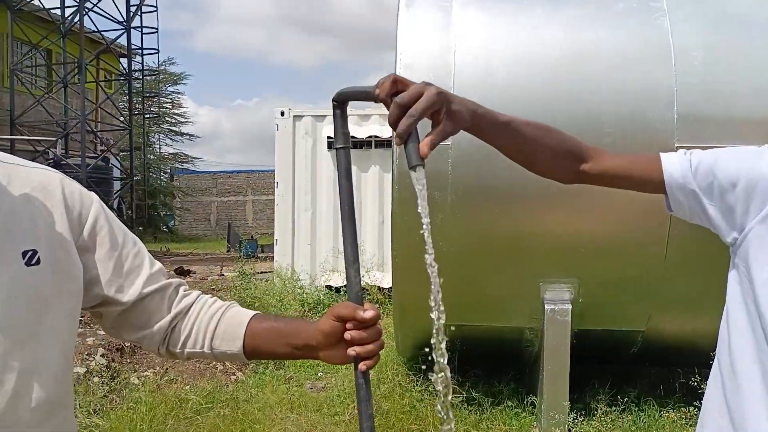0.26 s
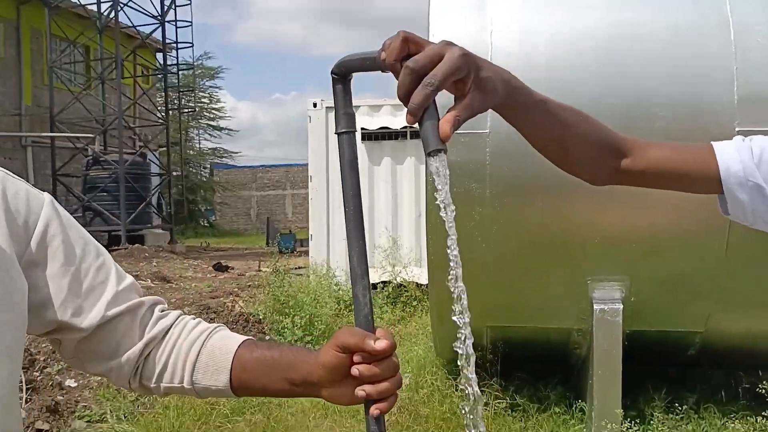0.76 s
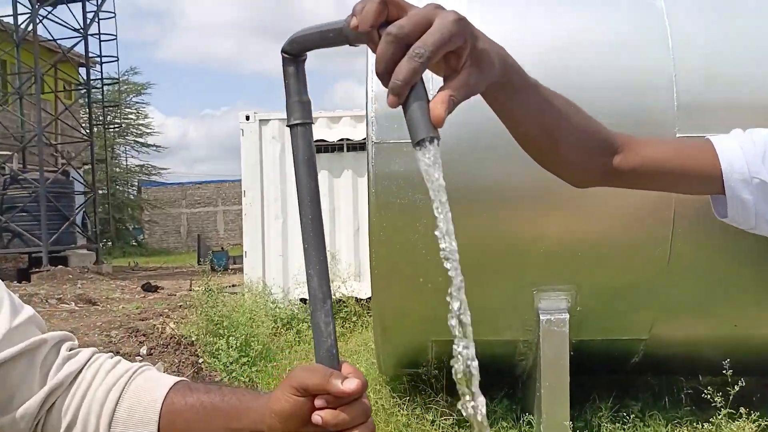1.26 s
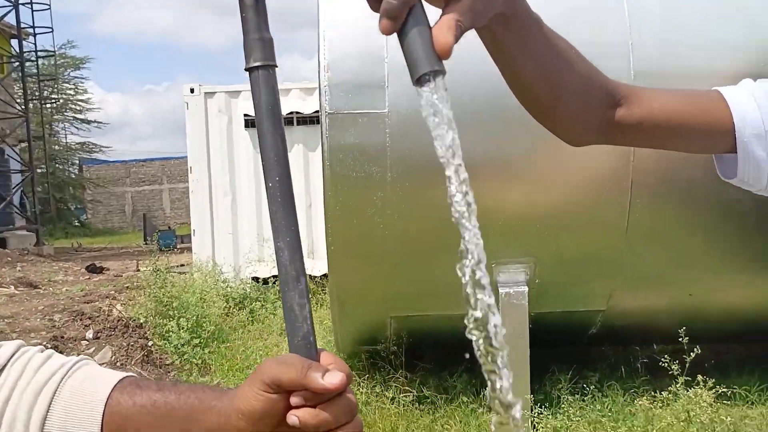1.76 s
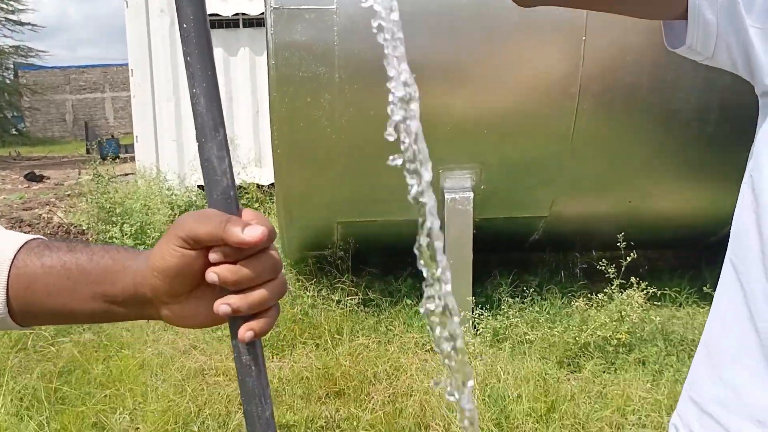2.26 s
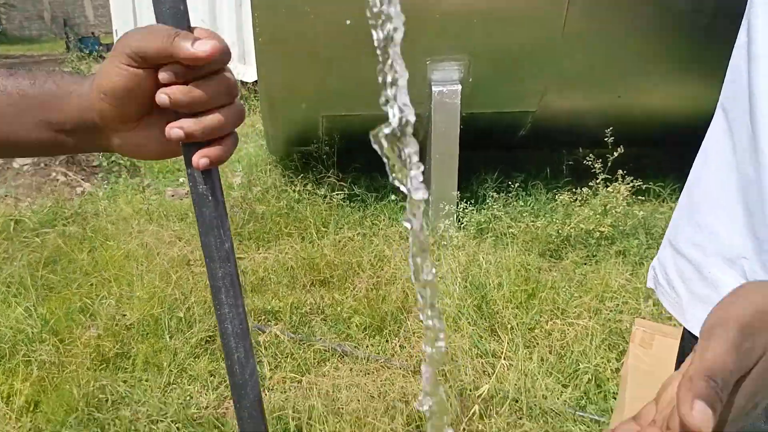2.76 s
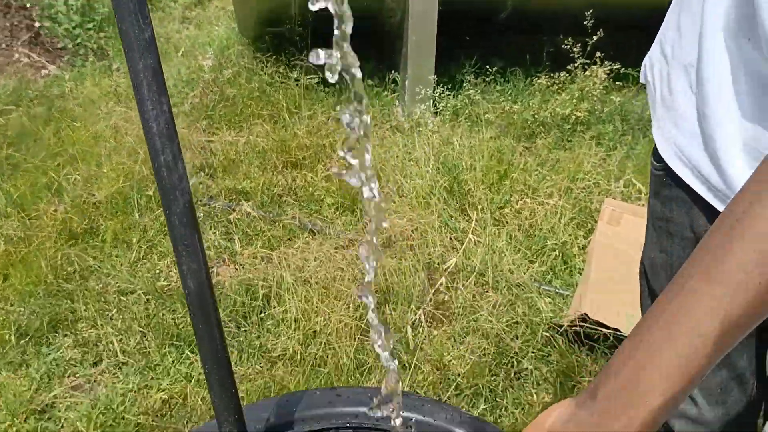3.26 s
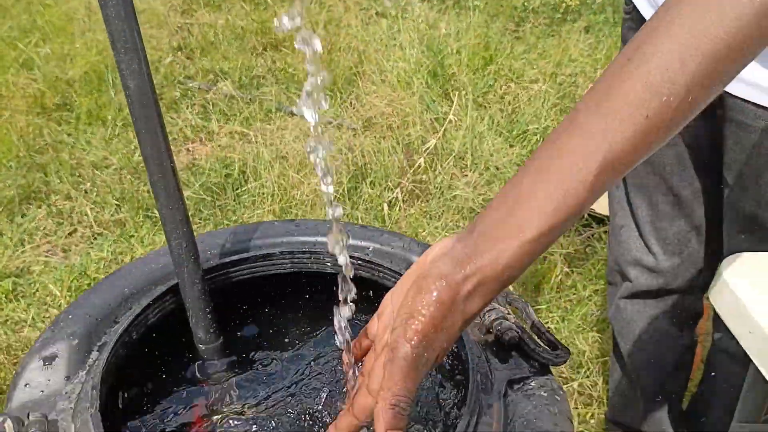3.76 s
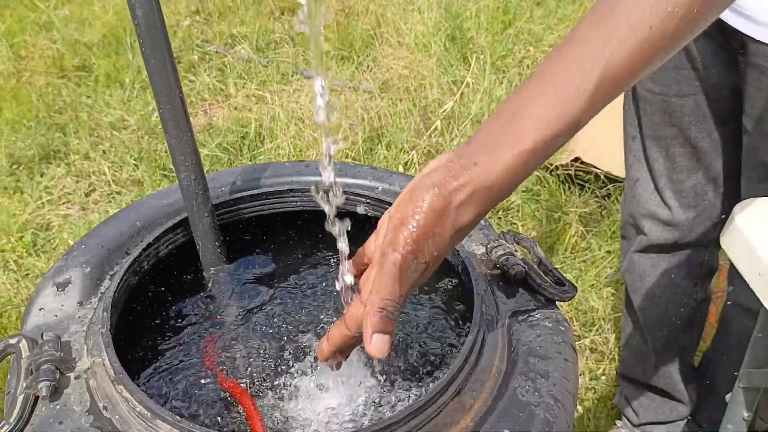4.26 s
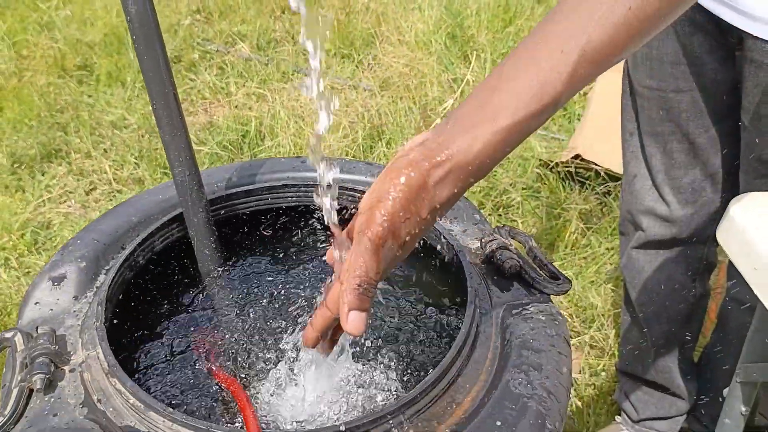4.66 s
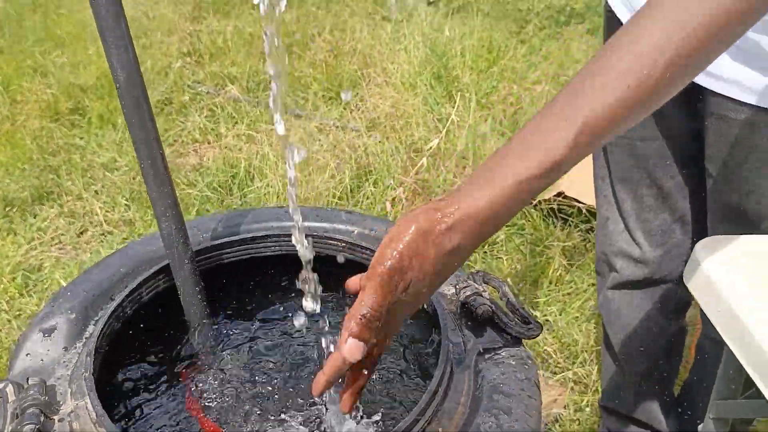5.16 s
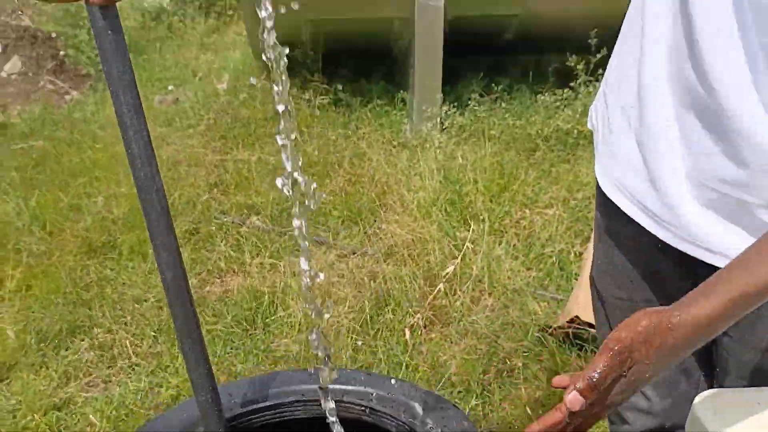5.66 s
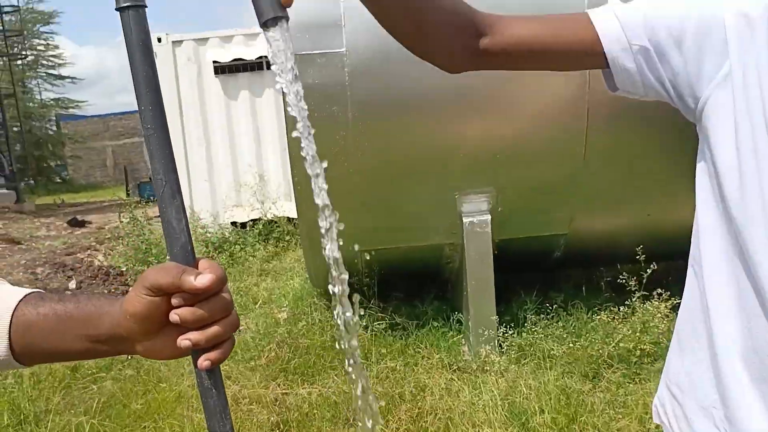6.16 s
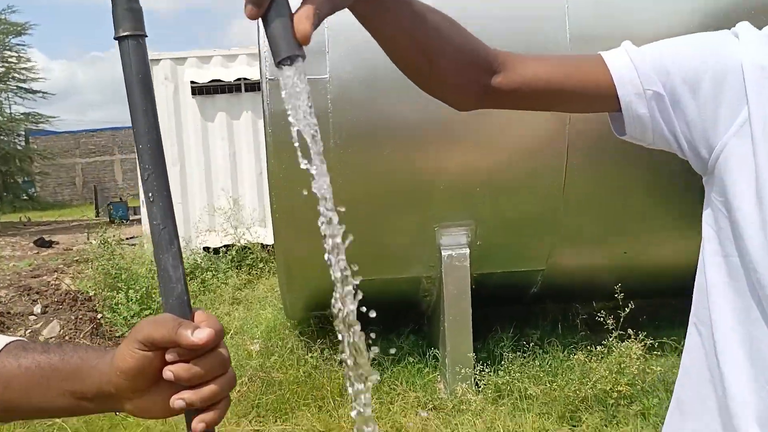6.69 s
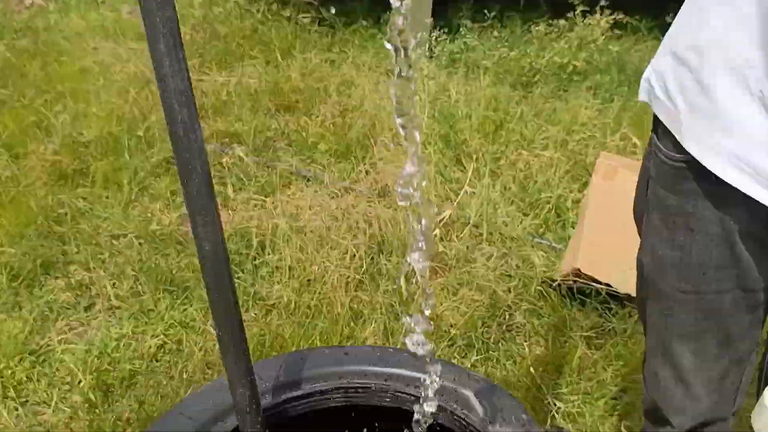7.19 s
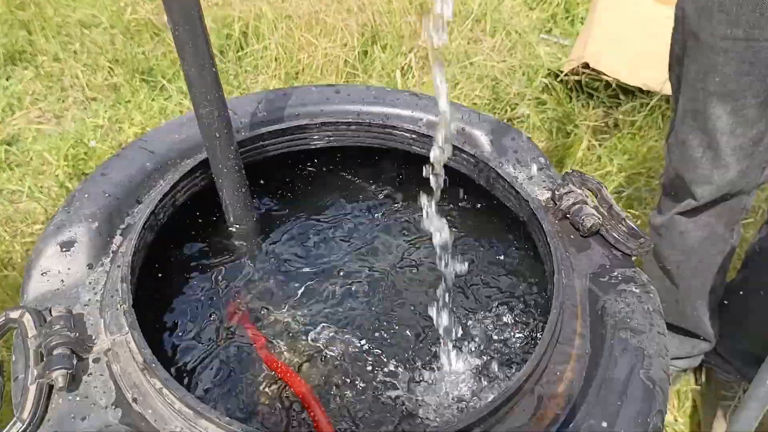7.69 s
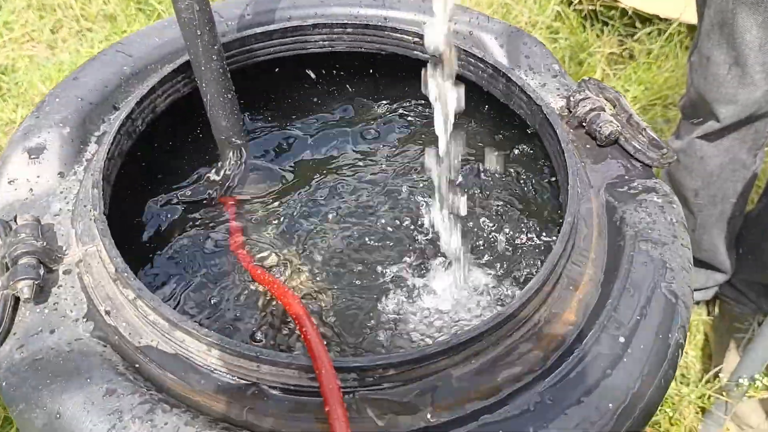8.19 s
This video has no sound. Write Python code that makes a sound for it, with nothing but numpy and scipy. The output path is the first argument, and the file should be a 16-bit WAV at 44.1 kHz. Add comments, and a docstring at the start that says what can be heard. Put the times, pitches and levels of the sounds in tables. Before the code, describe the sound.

A thin stream of water dribbles and plops into a full drum outdoors, bursts into loud bright spray over a hand, then thins to lighter splashes.

```python
"""A thin, uneven stream from a pump's outlet pipe first falls on open water in a full plastic drum outdoors,
then into foam: each surge is filtered drop noise and ringing bubbles that die away over a foam tail.
Just after 3 s it breaks over a hand into loud, bright spray; by 4.5 s it runs off the fingertips.
It then falls past the fingers, plunges from 6.6 s and ends shallow. Throughout, slaps (noise bursts
through resonances), plops (dying sines) and low noise of air on the microphone cross a quiet yard."""
import sys
import numpy as np
from scipy import signal
from scipy.io import wavfile
from scipy.ndimage import uniform_filter1d

SR = 44100
rng = np.random.default_rng(int(sys.argv[2]) if len(sys.argv) > 2 else 0)


def transcribe(u):
    """Save the signal u as a 16-bit wav file named by the first command-line argument.

    u: samples, shape (n,) or (channels, n), limited to [-1, 1]; the rate is SR.
    q: integer samples, one column per channel.
    """
    v = np.clip(np.atleast_2d(u).T, -1, 1)
    q = np.round(v * 32767).astype(np.int16)
    wavfile.write(sys.argv[1], SR, q)


N = 371763
TIME_S = np.arange(N) / SR
FLOW_STEP = 32  # samples between computed surge levels
RUMBLE_EDGE_HZ, GURGLE_EDGE_HZ, SPRAY_EDGE_HZ, CUTOFF_HZ = 130, 1000, 4400, 15700


def amp(db):
    """Decibels to gain."""
    return 10 ** (np.asarray(db) / 20)


def unit(x):
    """Scales to rms 1."""
    return x / np.sqrt(np.mean(x ** 2) + 1e-20)


def steady(x, size=2600):
    """Holds the rms near 1 over about a tenth of a second and keeps the quicker grain."""
    power = uniform_filter1d(uniform_filter1d(x ** 2, size), size)
    return x / np.sqrt(abs(power) + 1e-14)


def follow(rows):
    """Interpolates the columns of a curve to every sample."""
    time_s, *columns = np.transpose(rows)
    return [np.interp(TIME_S, time_s, column) for column in columns]


def add(mix, start_s, sound):
    """Mixes a sound in at its start time."""
    part = mix[max(round(start_s * SR), 0):][:len(sound)]
    part += sound[:len(part)]


def colour(x, spectrum, size=4096):
    """Minimum-phase filter with the given spectrum: causal, so that clicks stay sharp."""
    hz, db = np.transpose(spectrum)
    bin_hz = abs(np.fft.fftfreq(size, 1 / SR))
    log_gain = np.log(amp(np.interp(np.log(bin_hz + 1), np.log(hz), db)))
    taps = np.fft.ifft(np.exp(np.conj(signal.hilbert(log_gain)))).real
    return signal.oaconvolve(x, taps[:size // 2])[:len(x)]


def band(x, edge_hz, kind, order=5):
    """Butterworth filter."""
    return signal.sosfilt(signal.butter(order, edge_hz, kind, fs=SR, output="sos"), x)


def resonate(x, hz, width_hz):
    """Resonance of peak gain 1 that may move: shift to 0 Hz, smooth, shift back."""
    turn = np.exp(2j * np.pi * np.cumsum(hz * np.ones(len(x))) / SR)
    r = np.exp(-np.pi * width_hz / SR)
    smoothed = signal.lfilter([1 - r], [1, -r], x / turn + 1e-18)
    return 2 * (turn * smoothed).real


def emphasise(x, hz, width_hz, db):
    """Adds a steep-sided resonance that may move."""
    return x + amp(db) * resonate(resonate(x, hz, width_hz), hz, width_hz)


def wander(per_s):
    """Smooth random curve of rms 1."""
    points = rng.standard_normal(max(int(2 * per_s * N / SR), 4))
    return unit(signal.resample(points, N // 8 + 1)).repeat(8)[:N]


def patchy(x, depth_db, size=(19, 3)):
    """Lets narrow bands swell and fade as the foam changes shape; size in (frames, bins)."""
    z = signal.stft(x, nperseg=768, noverlap=640)[2]
    field = rng.standard_normal(z.shape)
    field = uniform_filter1d(field, size[0], axis=1)
    field = uniform_filter1d(field, size[1], axis=0)
    return signal.istft(z * amp(depth_db * unit(field)), nperseg=768, noverlap=640)[1][:N]


def bubble(hz, t60_s, rise, attack_cycles):
    """A dying sine whose pitch rises, by the share rise over t60, as the bubble nears the surface."""
    t = np.arange(int(max(t60_s, .002) * SR)) / SR
    onset = 1 - np.exp(-t * hz / attack_cycles)
    return onset * amp(-60 * t / t60_s) * np.sin(2 * np.pi * hz * t * (1 + rise * t / t60_s / 2))


# Spectrum of the quiet yard. Each row: frequency in Hz, relative density in dB per Hz.
YARD_SPECTRUM = [(59, -37.5), (100, 0), (228, -5.5), (655, 0), (809, -16), (1210, -1), (3470, -12.5),
                 (9370, -10.5), (15600, -14.5)]
YARD_DB = -69.5


def yard():
    """Steady filtered noise of the quiet yard."""
    return amp(YARD_DB) * unit(colour(rng.standard_normal(N), YARD_SPECTRUM))


# Surges of the stream. Each row: start in seconds, rise in seconds, hold in seconds, splash fade in dB
# per second, then splash, gurgle and fine spray levels in dB before the trims in stream().
SURGES = [(0.0, 0.0019, 0.028, 143, -62.5, -63.5, -61), (0.295, 0.0066, 0.17, 92, -62, -68.6, -57),
          (0.385, 0.058, 0.024, 44, -39, -48.5, -42.5), (0.574, 0.014, 0.16, 232, -45, -71, -63),
          (0.735, 0.0053, 0.053, 249.5, -47.5, -56.5, -50), (0.86, 0.004, 0.11, 280, -55.5, -55.5, -75.8),
          (1.073, 0.032, 0.136, 121, -54.5, -64.7, -64), (1.186, 0.029, 0.16, 100, -45, -54, -49.5),
          (1.457, 0.0037, 0.078, 42.5, -50, -60, -60.5), (1.589, 0.0027, 0.016, 280, -46, -67.8, -66.8),
          (2.068, 0.006, 0.1, 173, -61.5, -70.0, -69), (2.195, 0.016, 0.053, 62, -53.5, -53.5, -53),
          (2.29, 0.005, 0.13, 145, -56.2, -57, -67.4), (2.56, 0.21, 0.016, 46, -73, -69.5, -56.5),
          (2.784, 0.016, 0.012, 282, -43, -51.5, -44.5), (2.862, 0.009, 0.1, 57, -54.0, -63.5, -55.4),
          (3.002, 0.13, 0.015, 74, -25.6, -35, -21), (3.244, 0.18, 0.44, 42, -21, -36.5, -17.5),
          (3.244, 0.0083, 0.028, 106, -21, -39.5, -44), (3.967, 0.0029, 0.4, 107, -21.5, -40, -23.5),
          (4.387, 0.003, 0.032, 49.5, -29.5, -38, -46), (4.922, 0.029, 0.36, 58, -57, -65.5, -76),
          (5.298, 0.0022, 0.13, 66, -42.5, -49.5, -48.4), (5.494, 0.023, 0.023, 283, -52, -44.2, -65.5),
          (5.59, 0.04, 0.4, 17, -55, -59, -55.5), (5.831, 0.042, 0.055, 79, -40, -38.5, -40),
          (6.025, 0.003, 0.36, 261, -49, -65, -67), (6.606, 0.021, 0.041, 49, -33, -49, -41),
          (6.694, 0.0024, 0.0088, 130, -31, -35, -37.5), (6.909, 0.022, 0.088, 116, -39.5, -52.5, -54),
          (7.123, 0.0033, 0.12, 117.5, -50.0, -67, -61), (7.769, 0.027, 0.065, 279, -62.5, -74, -65.5),
          (8.277, 0.068, 0.015, 134.5, -54.9, -54.5, -51.1)]
GURGLE_FADE, SPRAY_FADE = 0.87, 0.78  # shares of the splash fade
FOAM_DB, FOAM_FADE_DB_PER_S = -26.7, 18.5  # foam tail relative to its surge
TRICKLE_DB = -81.5  # thin trickle between surges, in each band before trims


def swell(start_s, rise_s, hold_s, fade_db_per_s):
    """Power of one surge: it builds, holds, then dies away quickly over its slowly dying foam."""
    age_s = TIME_S[::FLOW_STEP] - start_s
    late_s = np.maximum(age_s - rise_s - hold_s, 0)
    build = np.clip(age_s / max(rise_s, .002), 0, 1) ** 2
    surge = amp(-fade_db_per_s * late_s) ** 2
    foam_tail = amp(FOAM_DB - FOAM_FADE_DB_PER_S * late_s) ** 2
    return build * (surge + foam_tail)


def flow():
    """Levels in dB of the splash, the gurgle and the spray: all surges add power to the trickle."""
    power = amp(TRICKLE_DB) ** 2
    for start_s, rise_s, hold_s, fade, *levels_db in SURGES:
        power = power + np.array([amp(db) ** 2 * swell(start_s, rise_s, hold_s, fade * share)
                                  for db, share in zip(levels_db, (1, GURGLE_FADE, SPRAY_FADE))])
    return [np.interp(TIME_S, TIME_S[::FLOW_STEP], 10 * np.log10(part)) for part in power]


# Spectrum of air on the microphone, before a 200 Hz low-pass.
# Each row: frequency in Hz, relative density in dB per Hz.
RUMBLE = [(8.8, -35), (15, 6), (43, 1), (59, -4), (80, -7), (102, -4), (134, -13.5), (200, -13.5),
          (260, -42.5), (440, -120)]
# Single gusts. Each row: centre in seconds, peak in dB before gust_db, time from the peak to 1/e power
# in seconds.
GUSTS = [(0.48, -42, .025), (0.64, -48, 0.025), (2.11, -54, 0.036), (2.92, -46, 0.033), (3.09, -30, 0.046),
         (3.41, -33.5, 0.06), (3.67, -34, 0.034), (3.85, -22, 0.02), (6.8, -44.5, .08), (8.35, -49, 0.028)]
# Buffeting level at the reference gurgle level, and its slope in dB per dB of gurgle.
BUFFET_DB, AT_GURGLE_DB, BUFFET_SLOPE = -43.5, -37, .8


def wind(gurgle_db, gust_db, lumpy_db):
    """Lumpy low rumble of air on the microphone, rising with each surge and in single gusts."""
    rumble = band(colour(rng.standard_normal(N), RUMBLE), 200, "low")
    rumble = rumble * amp(lumpy_db * wander(per_s=14))
    power = amp(BUFFET_DB + BUFFET_SLOPE * (gurgle_db - AT_GURGLE_DB)) ** 2
    for centre_s, peak_db, width_s in GUSTS:
        shape = np.exp(-np.minimum(((TIME_S - centre_s) / width_s) ** 2, 50))
        power = power + amp(peak_db + gust_db) ** 2 * shape
    return np.sqrt(power) * steady(rumble, size=4400)


# Large bubbles. Each row: start in seconds, level in dB, starting pitch in Hz, ring time t60 in seconds.
PLOPS = [(0.488, -30.5, 372, 0.089), (0.889, -51, 404, 0.17), (0.955, -45, 703, 0.24),
         (1.544, -38.5, 427, 0.097), (2.209, -47, 630, 0.11), (2.302, -35.5, 374, 0.11),
         (2.419, -40, 362, 0.081), (2.554, -48.5, 390, 0.096), (2.859, -43.5, 665, 0.16),
         (3.024, -26, 1146, 0.096), (3.169, -16, 340, 0.056), (3.292, -24.5, 986, 0.16),
         (3.529, -19.5, 313, 0.085), (3.545, -24, 209.3, 0.14), (3.569, -25.5, 877, 0.2),
         (3.668, -31, 890, 0.27), (3.862, -21, 910, 0.044), (4.366, -11.5, 334, 0.041),
         (4.409, -27, 263, 0.14), (4.449, -29, 230, 0.19), (5.002, -38.5, 296, 0.1), (5.13, -47, 690, 0.11),
         (5.311, -20.5, 186, 0.041), (5.514, -38.5, 422, 0.18), (5.54, -41, 828, 0.13),
         (5.75, -41.5, 622, 0.21), (5.887, -26, 376, 0.086), (5.949, -38, 472, 0.32),
         (6.702, -24.5, 337, 0.064), (6.839, -38, 321, 0.21), (7.043, -36, 310, 0.058),
         (7.05, -40.5, 670, 0.083), (7.655, -57, 440, 0.17), (7.837, -50, 416, 0.12),
         (8.04, -57, 668, 0.19)]


def plops(rise, twin):
    """Large pockets of air break off and ring, each with a weaker, smaller twin just after it."""
    out = np.zeros(N)
    for (start_s, db, hz, t60_s), (lag, smaller) in zip(PLOPS, rng.random((len(PLOPS), 2))):
        add(out, start_s, amp(db) * bubble(hz, t60_s, rise, attack_cycles=1.0))
        twin_sound = bubble(hz * (1 + 0.11 * smaller), t60_s, rise, attack_cycles=1.5)
        add(out, start_s + 0.014 * lag, twin * amp(db) * twin_sound)
    return out


# Tone of the water in each landing place. Each row: frequency in Hz, relative density in dB per Hz.
OPEN_WATER = [(88, -52), (150, -0.5), (285, -6), (381, -1.5), (573, -7.5), (752, -7), (1070, -14.5),
              (1570, -4.5), (1990, -3), (2610, -22), (2980, -11), (3920, -16), (5140, -14.5), (8850, -18),
              (15600, -29.5)]
ON_HAND = [(88, -34), (150, -13), (205, -12.5), (285, -21), (326, -11), (573, -16.5), (913, -12.5),
           (1870, -24), (2560, 3), (2930, -3), (4070, -0.5), (6360, -11), (9950, -6.5), (13600, -10.5),
           (15600, -25)]
IN_PALM = [(88, -70), (150, -26), (339, -17), (472, -10), (500, -22.5), (913, -21), (1840, -29), (2560, -1),
           (2980, -10), (3990, -2.5), (5340, -15), (7150, -7.5), (9760, -6.5), (13800, -13.5), (15600, -25)]
OFF_FINGERTIPS = [(88, -32), (150, -13), (381, -9), (500, -14), (737, -16), (812, -15), (1950, -16.5),
                  (2660, -6), (2980, -14), (3230, -2), (4580, -8.5), (13100, -13), (15600, -25)]
PAST_FINGERS = [(88, -38), (150, -2.5), (296, -7.5), (381, -6.5), (913, -11), (1090, 0.5), (1950, 2.5),
                (2190, -9.5), (2710, -16), (2930, -7), (3770, -14), (7290, -18.5), (8520, -20.5),
                (12300, -19.5), (15600, -34)]
PLUNGING = [(88, -32), (150, -12), (213, -8.5), (353, 1), (404, -8.5), (987, -15), (1480, -1),
            (2360, -19.5), (2930, -23), (3620, -28), (5660, -28), (6620, -32), (7430, -27.5),
            (13300, -38.5), (15600, -43)]
IN_FOAM = [(88, -54), (150, -6.5), (308, -12.5), (381, -7.5), (828, -14), (1570, -5), (1770, -11.5),
           (1950, -6.5), (2270, -11.5), (3040, -5), (4150, -19), (5340, -11.5), (6880, -15.5),
           (10500, -9.5), (15600, -35)]
GRAZING = [(88, -62), (150, -15), (249, -10), (656, -11.5), (828, -16), (1200, -2), (1350, -10.5),
           (2320, -16.5), (2460, -26), (3040, -10.5), (3350, -7), (5450, -1.5), (7730, -17.5),
           (13300, -7.5), (15600, -27)]
SHALLOW = [(88, -38), (150, -9.5), (249, -18.5), (374, -4), (500, -22), (619, -16), (723, -22), (1400, -5),
           (2560, -14.5), (6360, 2.5), (7430, -8), (14400, -17), (15600, -27)]
# Landing places in turn. Each row: start in seconds, tone table.
LANDINGS = [(0, OPEN_WATER), (.87, IN_FOAM), (2.64, GRAZING), (3.13, ON_HAND), (3.92, IN_PALM),
            (4.5, OFF_FINGERTIPS), (5.3, PAST_FINGERS), (6.58, PLUNGING), (8.1, SHALLOW)]


def landed(x, fade_s=0.022):
    """Gives a sound the tone of the place where the stream lands at each moment."""
    out = np.zeros(N)
    for start_s, tone in LANDINGS:
        share = np.clip((TIME_S - start_s) / fade_s + 1, 0, 1)
        out = (1 - share) * out + share * unit(colour(x, tone))
    return out


# Droplet size, heard as the centre of the spray. Each row: time in seconds, frequency in Hz.
SIZZLE = [(0.0, 6950), (0.48, 5450), (0.85, 7540), (1.2, 10700), (1.7, 8100), (2.2, 10200), (2.33, 7500),
          (2.75, 5430), (3.1, 6000), (3.4, 9400), (3.72, 6900), (3.86, 9500), (4.08, 7300), (4.45, 9000),
          (5.05, 8000), (5.3, 4750), (5.48, 8000), (5.65, 6000), (5.98, 6400), (6.19, 10400), (6.4, 6500),
          (6.65, 6400), (7.1, 7800), (8.43, 5980)]
# Lumps of water. Each row: start in seconds, ring peak in dB before ring_db, ring pitch in Hz,
# crack peak in dB, time constant of the exciting noise in seconds.
SLAPS = [(0.3016, -49, 2080, -41, 0.0045), (0.396, -33.5, 3500, -26, 0.0051),
         (0.414, -32, 2180, -24.5, .006), (0.4345, -24, 1960, -35, 0.01),
         (0.495, -29.5, 3400, -26.5, 0.0053), (0.597, -34.5, 1460, -29, 0.0061),
         (0.68, -38, 1620, -33, 0.0084), (0.893, -33, 2590, -55, 0.0082), (1.1868, -34, 1490, -53, 0.0099),
         (1.2084, -21.5, 1840, -32.5, 0.014), (1.2505, -30, 1740, -35.5, .012),
         (1.299, -35, 2760, -42, .005), (1.3528, -48, 2570, -30, 0.0031),
         (1.4856, -31.5, 1920, -40, 0.0057), (1.612, -37.5, 3180, -58, 0.015),
         (2.0705, -40, 1660, -56, 0.0072), (2.2052, -49, 1580, -28.5, 0.0088),
         (2.809, -42, 4230, -27.5, 0.0043), (2.998, -33, 3000, -35, 0.013),
         (3.02, -30, 1180, -14.5, 0.0097), (3.08, -20, 3500, -9.5, 0.022), (3.137, -8.5, 4510, -26, .006),
         (3.3644, -14, 2370, -4, 0.0076), (3.4274, -6, 2540, -13, 0.0046), (3.505, -19, 3400, -12, 0.017),
         (3.542, -10, 4460, 0.5, 0.007), (3.5818, -14, 2730, -22, 0.0083),
         (3.6182, -17, 3880, -11.5, 0.0081), (3.705, -10, 3270, -9, 0.036),
         (3.7394, -12.5, 2270, -4, 0.011), (3.7971, -15, 2640, -8, 0.0064), (3.8817, -7.5, 3200, -4, 0.019),
         (4.0069, -10, 2500, -14.5, 0.0056), (4.0398, -5.5, 2580, -40, 0.011),
         (4.1847, -2.5, 3060, -9, 0.006), (4.2953, -16, 2660, -16.5, 0.012), (4.3573, -10, 2450, -28, .008),
         (4.5608, -26, 3263, -38, .006), (5.2973, -34.5, 4550, -55, 0.023),
         (5.3116, -27.5, 1680, -51, 0.016), (5.434, -29, 1880, -39, 0.0034), (5.84, -53, 1430, -28, 0.0036),
         (5.8779, -37, 1800, -16.5, 0.011), (5.945, -34, 1950, -23, 0.0083), (6.1735, -40, 1430, -29, .004),
         (6.6218, -15.5, 1360, -22.5, .012), (6.6413, -17, 1430, -26, 0.012),
         (6.6925, -13.5, 1440, -37, 0.0023), (6.7144, -20, 1430, -31, 0.0053),
         (6.7458, -19.5, 1480, -20.5, 0.007), (6.8032, -25.5, 1710, -32, 0.0086),
         (6.977, -30, 1520, -36, 0.0095), (7.006, -32, 1430, -44, 0.0066),
         (7.1287, -34.5, 1490, -38, 0.0043), (7.343, -42.5, 1570, -54, 0.013),
         (7.6553, -50.5, 989, -45, 0.011), (7.85, -52, 1220, -62.5, 0.015),
         (8.094, -51.5, 2825, -52.5, .005), (8.3232, -54, 1460, -26.5, .004)]


def slaps(ring_db, ring_width_hz, crack_width_hz, size=3000):
    """A lump of water cracks on the surface and rings the cavity that it opens."""
    out = np.zeros(N)
    t = np.arange(size) / SR
    for start_s, ring_peak_db, ring_hz, crack_peak_db, decay_s in SLAPS:
        tone = [tone for since_s, tone in LANDINGS if since_s <= start_s][-1]
        body, spray = rng.standard_normal((2, size)) * np.exp(-t / decay_s)
        ring = resonate(colour(body, tone), ring_hz, ring_width_hz)
        crack_hz = np.interp(start_s, *np.transpose(SIZZLE))
        crack = band(colour(spray, tone), SPRAY_EDGE_HZ, "high")
        crack = resonate(crack, crack_hz, crack_width_hz)
        add(out, start_s, amp(ring_peak_db + ring_db) * ring / abs(ring).max())
        add(out, start_s, amp(crack_peak_db) * crack / abs(crack).max())
    return out


def strikes(per_s, spread_db):
    """Random impulses, most small and a few large."""
    chance, size = rng.random((2, N))
    hit = np.flatnonzero(chance < per_s / SR)
    train = np.zeros(N)
    train[hit] = amp(spread_db * np.minimum(-np.log(1 - size[hit]), 4))
    return train


def drops(per_s, spread_db, burst_s, wash):
    """Each drop bursts into a brief puff of droplets over a wash of smaller ones."""
    r = np.exp(-2 / (burst_s * SR))
    power = signal.lfilter([1], [1, -r], strikes(per_s, spread_db) ** 2)
    return unit(np.sqrt(power / power.mean() + abs(wash)) * rng.standard_normal(N))


def foam(cycles, spread_db, rise, count=2600):
    """Bubbles of all sizes; each rings for a few dozen cycles, so the small ones tend to be briefest."""
    out = np.zeros(N)
    for when, pitch, size, life in rng.random((count, 4)):
        hz = 220 * (3800 / 220) ** np.sqrt(pitch)
        loudness = amp(spread_db * min(-np.log(1 - size), 3)) * hz ** .3
        t60_s = cycles * (.5 + life) / hz
        add(out, when * N / SR, loudness * bubble(hz, t60_s, rise, 0.43))
    return unit(out)


WAVER, SWELL_DB = .016, 2.5  # rms wander of a ring's pitch (share) and strength


def pocket(ring):
    """Pitch and strength of one ring of the air pocket, which never keeps still."""
    hz, db = follow(ring)
    return hz * (1 + WAVER * wander(per_s=14)), db + SWELL_DB * wander(per_s=12)


# Two rings of the air pocket under the stream, wandering as it changes shape.
# Each row: time in seconds, mean pitch in Hz, mean strength in dB.
LOWER_RING = [(0.0, 1530, 2), (0.42, 1960, 5), (0.62, 1480, 2), (0.9, 2050, 10.5), (1.02, 1500, -6),
              (1.25, 1880, 4), (1.36, 1470, 8), (1.5, 1920, -2), (1.65, 1200, 3), (2.1, 1590, 3),
              (2.4, 1250, 11.5), (2.82, 1550, 10.5), (2.95, 1310, -8), (3.15, 1300, 8), (3.7, 2340, -3),
              (4.1, 2100, 5), (4.7, 1590, -27.5), (5.2, 1560, 9), (5.75, 1480, -3), (6.03, 2010, 3),
              (6.38, 1705, 13), (6.63, 1473, 6.5), (6.85, 1600, 0), (6.92, 1535, 9.5), (7.5, 1486, 0),
              (8.43, 1400, 1.5)]
UPPER_RING = [(0.05, 3250, 16), (0.5, 3350, 13), (0.9, 2550, 11), (1.08, 3060, 2), (1.28, 2960, -8),
              (1.48, 2520, 12), (1.6, 3050, 8), (1.8, 2780, 5), (2.05, 2470, 13), (2.38, 2440, 8),
              (2.57, 2140, -6), (2.66, 3800, 1), (2.83, 4270, 15), (2.87, 3720, -4), (2.92, 3080, 17),
              (3.3, 3020, -3), (3.7, 3390, -2.5), (4.2, 3200, 1), (4.58, 3290, 8.5), (4.82, 2780, 11),
              (5.15, 2380, 12), (5.45, 2440, 18), (5.65, 2960, 4), (6.72, 2900, -8), (6.86, 2940, 17.5),
              (6.95, 2904, 1.5), (8.43, 3100, 3)]


def stream(splash_level_db, gurgle_level_db, spray_level_db, splash_trim_db, spray_trim_db,
           lower_width_hz, upper_width_hz, sizzle_db, sizzle_width_hz, clump_db):
    """Drops and bubbles arrive in clumps, take the tone of the landing place and ring the air pocket."""
    lower_hz, lower_db = pocket(LOWER_RING)
    upper_hz, upper_db = pocket(UPPER_RING)
    clumps = amp(clump_db * wander(per_s=32))
    impacts = drops(per_s=380, spread_db=3, burst_s=.0026, wash=.5)
    bubbles = foam(cycles=55, spread_db=2.2, rise=.08)
    churn = patchy(impacts, depth_db=2.8, size=(27, 8)) * clumps
    # a heavy splash merges into a dense rush; in a light one single bubbles ring out
    light = np.clip((-22 - splash_level_db) / 10, .35, 1)

    # deep down the water rolls too slowly to follow single drops
    rolling = patchy(rng.standard_normal(N), depth_db=2.8) * clumps
    gurgle = landed(rolling + .5 * light * bubbles)
    gurgle = band(gurgle, [RUMBLE_EDGE_HZ, GURGLE_EDGE_HZ], "band")

    ringing = patchy(churn, depth_db=2.6) + .5 * bubbles
    splash = landed(light * ringing + (1 - light) * churn)
    splash = band(splash, [GURGLE_EDGE_HZ, SPRAY_EDGE_HZ], "band")
    splash = emphasise(splash, lower_hz, lower_width_hz, lower_db)
    # a stronger splash tears the pocket open and broadens its upper ring
    wide = np.clip((splash_level_db + 58) / 20, .2, 1)
    narrow_ring = emphasise(splash, upper_hz, upper_width_hz, upper_db)
    broad_ring = emphasise(splash, upper_hz, 2 * upper_width_hz, upper_db)
    splash = (1 - wide) * narrow_ring + wide * broad_ring

    # the finest droplets crackle with the same impacts, in clusters of like size
    clusters = patchy(churn, depth_db=2.6, size=(25, 13))
    spray = band(landed(light * clusters + (1 - light) * churn), SPRAY_EDGE_HZ, "high")
    spray = emphasise(spray, follow(SIZZLE)[0], sizzle_width_hz, sizzle_db + 20 * np.log10(light))

    return (amp(splash_level_db + splash_trim_db) * steady(splash)
            + amp(gurgle_level_db) * steady(gurgle)
            + amp(spray_level_db + spray_trim_db) * steady(spray))


def scene():
    """The quiet yard, air on the microphone, and the stream with its plops and slaps."""
    splash_db, gurgle_db, spray_db = flow()
    mix = yard()
    mix += wind(gurgle_db, gust_db=-1.5, lumpy_db=3.0)
    mix += plops(rise=0.038, twin=0.69)
    mix += slaps(ring_db=0.5, ring_width_hz=200, crack_width_hz=3300)
    mix += stream(splash_db, gurgle_db, spray_db, splash_trim_db=-0.77, spray_trim_db=0.46,
                  lower_width_hz=183, upper_width_hz=260, sizzle_db=-10, sizzle_width_hz=1500,
                  clump_db=1.58)
    return mix[None]


def record(dry):
    """Clips peaks at full scale, then limits the band."""
    lowpass = signal.firwin(401, CUTOFF_HZ, window=("kaiser", 8), fs=SR)
    return signal.oaconvolve(np.clip(dry, -1, 1), lowpass[None], "same")


dry = scene()
out = record(dry)
transcribe(out)
```